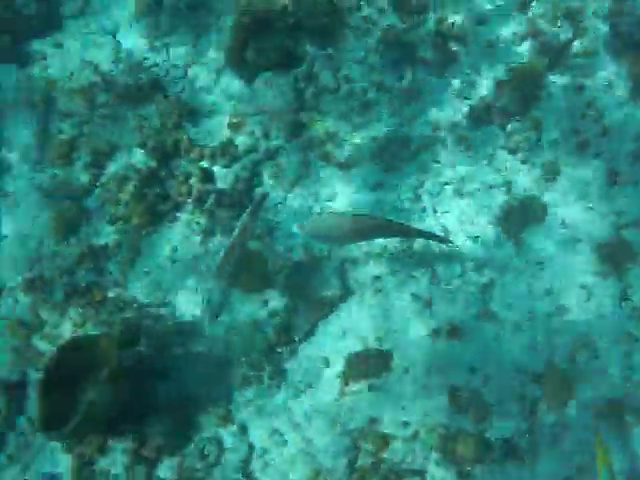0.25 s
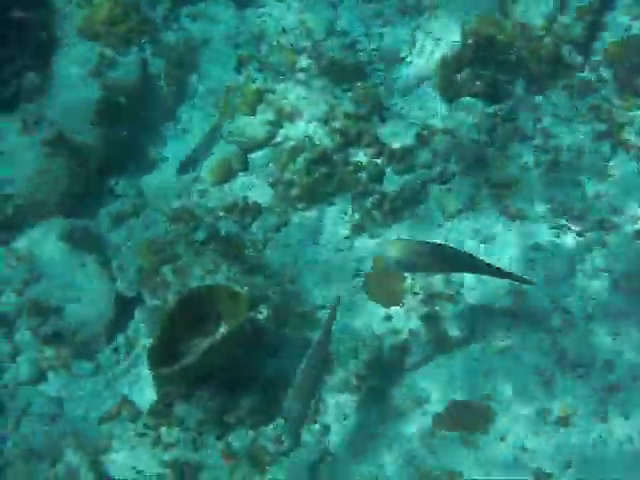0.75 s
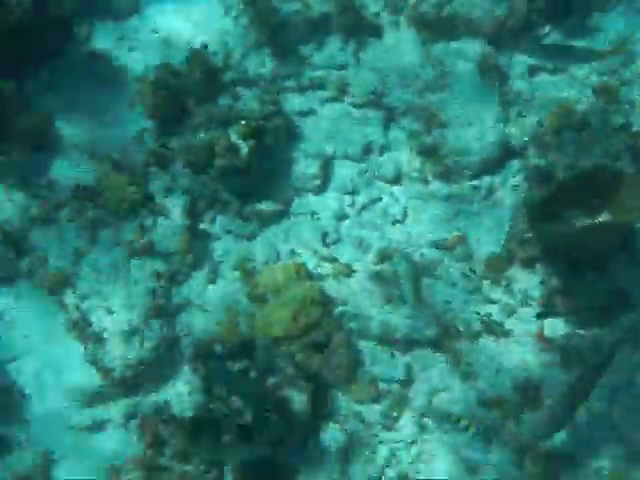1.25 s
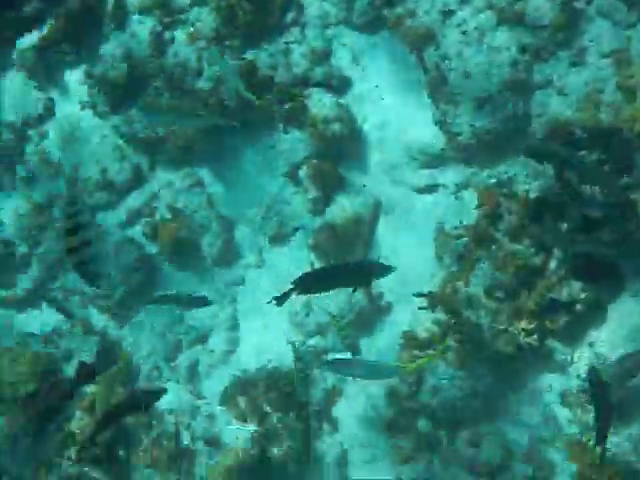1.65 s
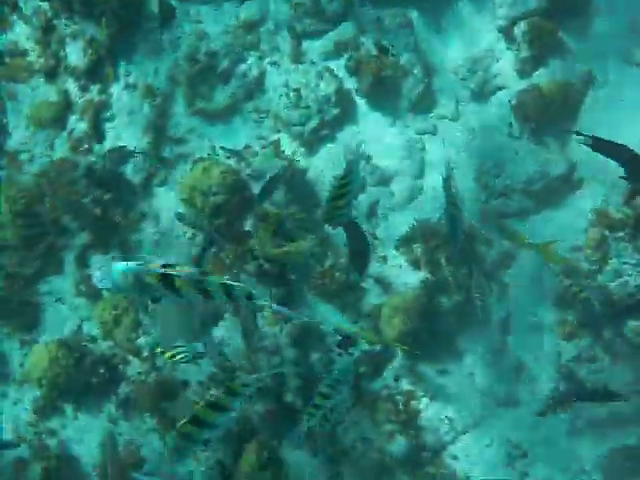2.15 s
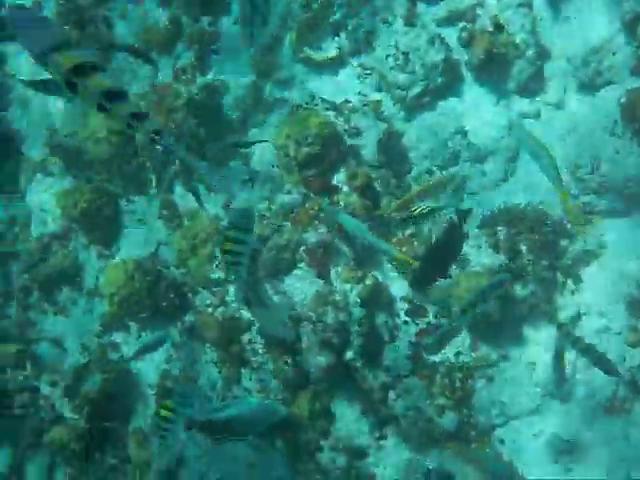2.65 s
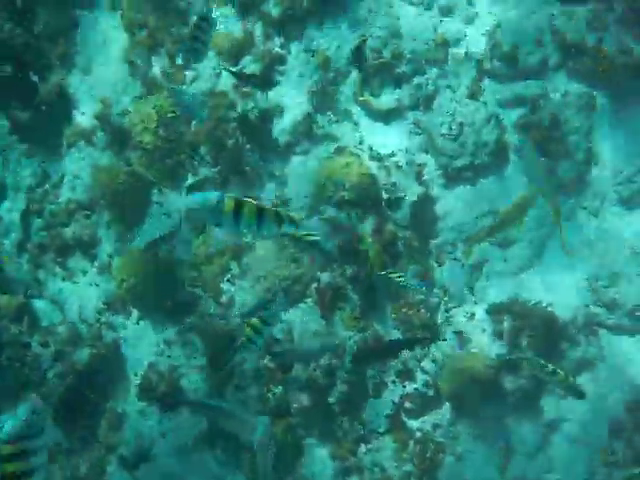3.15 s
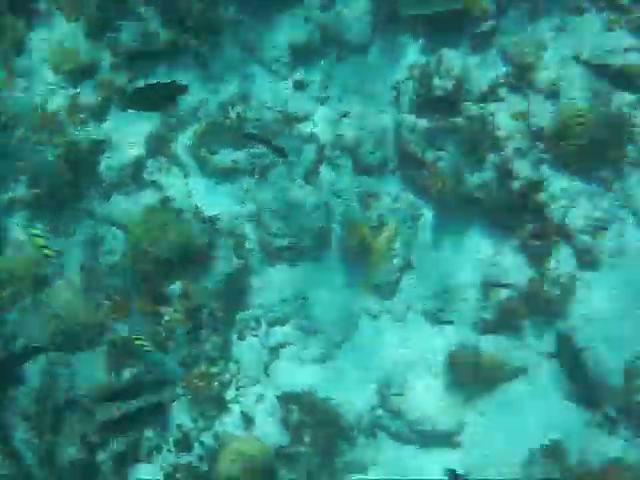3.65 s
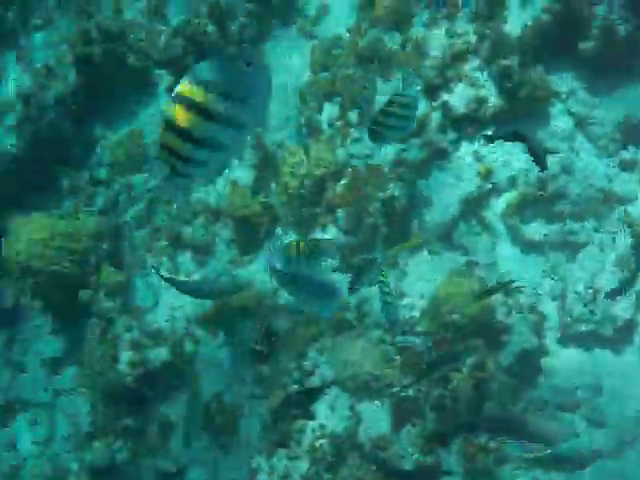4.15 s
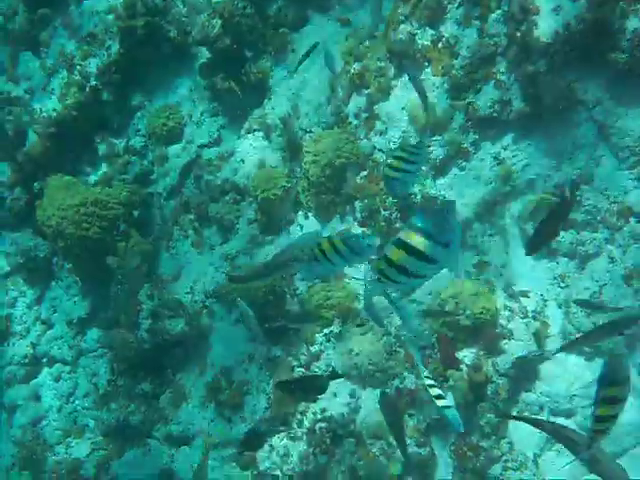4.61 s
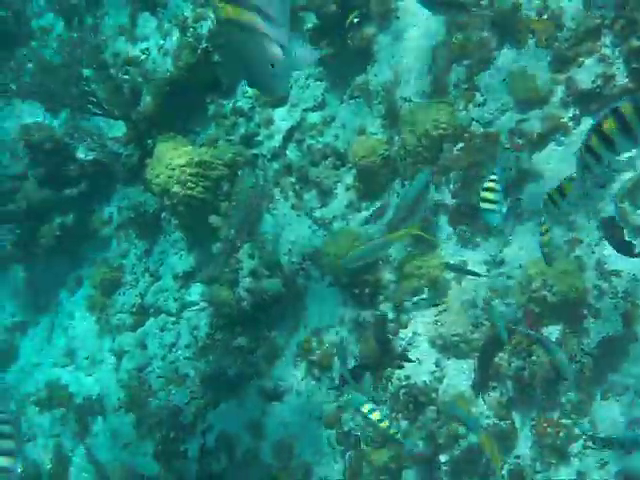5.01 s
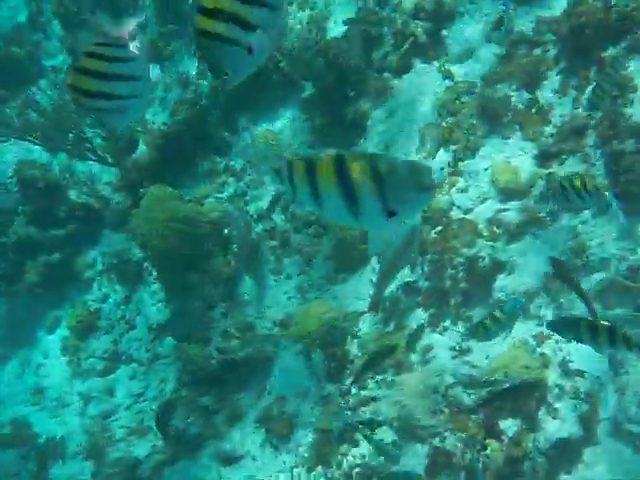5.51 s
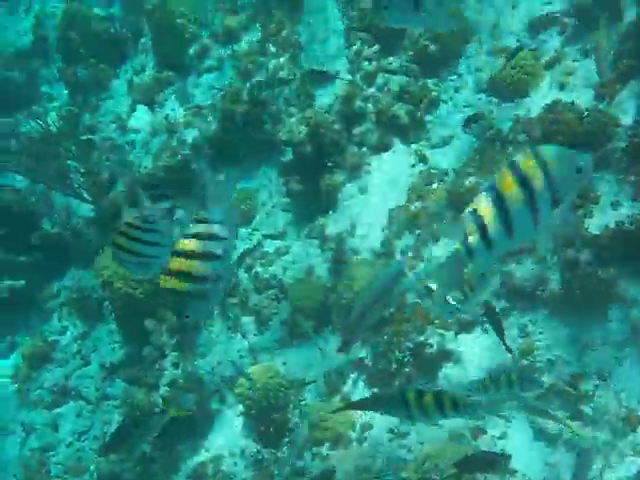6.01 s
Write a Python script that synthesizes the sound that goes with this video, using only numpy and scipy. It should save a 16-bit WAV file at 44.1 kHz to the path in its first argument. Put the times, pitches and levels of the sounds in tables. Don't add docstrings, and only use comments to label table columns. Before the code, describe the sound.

A muffled microphone sealed in a small case hears a boat idling away from a swimmer above a reef. The hollow, buzzing engine pulses fast and evenly, with fine crackle around it. Isolated clicks and knocks come first, then bubbling and sloshing build to a brief distorted burst of thumps, scrapes and snaps. It settles back to the receding motor, light taps and a final small bubble.

```python
import sys
import numpy as np
from scipy import signal
from scipy.fft import rfft, irfft, next_fast_len
from scipy.io import wavfile
from scipy.ndimage import uniform_filter1d, minimum_filter1d, map_coordinates

SR = 44100
rng = np.random.default_rng(int(sys.argv[2]) if len(sys.argv) > 2 else 0)


def invert_db(level):
    return 10 ** (np.asarray(level, dtype=float) / 20)


def file_out(sig):
    cols = np.atleast_2d(sig).T
    lim = np.clip(cols, -1, 1)
    pcm = np.round(lim * 32767).astype(np.int16)
    wavfile.write(sys.argv[1], SR, pcm)


N = 276507
TIME = np.arange(N) / SR

# start_s, peak_db, pitch_hz
NEAR_SNAPS = [(0.33, -21, 3100), (0.4943, -12.5, 3870), (0.5195, -15.5, 3000), (0.544, -31, 4300),
              (0.558, -25, 4200), (0.5, -15, 3000), (0.596, -17, 3300), (0.618, -17, 2880),
              (0.635, -22.5, 3280), (.654, -21, 2970), (.824, -19, 3400), (1.0905, -15, 3240),
              (1.356, -27, 3000), (2.178, 2, 3070), (2.2022, -12, 3300), (2.636, -11.5, 3340),
              (3.0095, -12.5, 3100), (3.4845, -13.5, 3100), (3.6162, -23, 3100), (3.6358, -0.5, 3470),
              (3.6547, 5, 3150), (3.6725, -0.5, 3480), (3.687, -3, 2940), (3.7593, -5, 4220),
              (3.8266, 6.5, 3580), (4.8173, -24, 3500), (5.1282, -27, 4600), (5.197, -20, 4000),
              (5.2202, -12.5, 3750), (5.38, -19, 3150)]
# frequency_hz, density_db (per Hz)
FAR_CRACKLE = [(1500, -39.5), (2500, 27), (4000, 20.5), (5300, 18), (6300, -70)]
SNAP_T60_S, LOUD_RINGS_LONGER = 0.011, 0.18

# peak_s, surge_db, gurgle_db, half_length_s
SLOPS = [(1.24, -32, -41.5, 0.45), (3.137, -24, -12, .04), (3.295, -15.5, -24.5, .09),
         (3.414, -36, -15.5, 0.056), (3.649, -7, -8, 0.074), (3.7, -14.5, 2, 0.08), (3.822, -10, -8, 0.053),
         (3.932, -20, -26.5, 0.12), (4.004, -23, -18, 0.015), (4.075, -24.5, -13, 0.14),
         (4.17, -27.5, -19.5, 0.094), (4.267, -26.5, -30, 0.067), (4.508, -30, -38.5, 0.12),
         (2.886, -32, -30, 0.11)]
# frequency_hz, density_db (per Hz)
SURGE_SPECTRUM = [(8, -4), (22, 0), (45, -6), (80, -10), (120, -40)]
# frequency_hz, density_db (per Hz)
GURGLE_SPECTRUM = [(60, -54), (100, -7), (200, -3), (330, -6), (450, -1), (750, -46), (1500, -40.5)]
# start_s, length_s, signed_size (full scale)
PUSHES = [
    (3.431, .013, .21),
    (3.753, .07, -.42),
    (3.828, 0.052, .33),
    (3.912, 0.067, -0.096),
    (3.968, .04, .1),
]
CALM_SURGE_DB, CALM_GURGLE_DB = (-38.5, -36.5), (-28.5, -33)
SWELL_DB = 1.2
FALL_DB, RELEASE = 23.5, 1.13

# start_s, peak_db, pitch_hz, t60_s
BUBBLES = [(1.248, -10, 53, 0.051), (3.007, -11.5, 361, 0.046), (3.064, -7, 246, 0.03),
           (3.123, 4.5, 319, 0.085), (3.251, -18.5, 92.5, 0.093), (3.273, -12.5, 189, 0.14),
           (3.327, -18, 209.6, 0.084), (3.41, -13, 392, 0.093), (3.455, -3, 72, 0.027),
           (3.512, -19, 267, 0.097), (3.739, -11, 319, 0.068), (3.827, -11.5, 330, 0.083),
           (3.901, -17.5, 54.8, 0.041), (3.981, -17, 105, 0.037), (4.063, -4, 339.4, 0.019),
           (4.087, -10, 137, 0.14), (4.117, -10, 47.7, 0.15), (4.166, -9.5, 275, 0.071),
           (5.857, -14.5, 148.4, 0.069),
           (6.018, -7, 835, .09),
    (3.614, -2, 125, .07),
    (3.585, -13, 150, .05),
    (3.66, -4, 110, .06),
    (3.715, -5, 120, .06),
]

# start_s, length_s, level_db
SCRAPES = [
    (3.622, .04, 7.5),
    (3.668, 0.027, 6),
    (3.823, .011, 9),
]
# frequency_hz, density_db (per Hz)
RUBBING_SPECTRUM = [(90, -8), (200, 14.5), (450, 5.5), (800, 5.5), (1500, 0), (3000, -18), (5500, -31.5),
                    (7000, -48)]
# start_s, peak_db
HARD_KNOCKS = [(0.4929, 6), (2.178, 10.5), (3.7633, 9), (3.8218, 7.5), (5.178, -6), (5.367, -1.5), (2.38, -4),
               (3.332, 0), (3.789, -2), (3.942, -2), (5.347, -7), (6.186, -9.5), (6.223, -10.5)]
# frequency_hz, level_db
KNOCK_MODES = [(800, -1), (1050, -0.5), (1600, -12)]

FIRING_HZ, CYLINDERS = 52.63, 8
# time_s, lag_ms
DRIFT = [(0, 5.9), (.3, 7.3), (.95, 7.95), (1.25, 7.6), (1.8, 6.55), (2.4, 7.0), (2.75, 8.2), (3.3, 9.25),
         (3.9, 9.55), (4.55, 10.9), (5.25, 9.95), (5.7, 10.45), (6, 11.4), (6.3, 11.75)]
# time_s, loudness_db, hidden_share (0-1, behind the swimmer)
LOUDNESS = [(0, 5, 0.9), (.25, 1, 0.52), (.5, 3, 0.4), (1.1, -1.5, 0.04), (1.6, -3, 0.03), (2.1, 0.5, .05),
            (2.6, 0.5, .01), (3.1, -0.1, 0.2), (3.5, -3.5, 0.02), (4.4, -5.5, .05), (5.1, -6, .1),
            (5.8, -4.5, 0.13), (6.27, -11.5, 0)]
# low_hz, high_hz, repeating_share (0-1), roughness (0-1), knock_gain_db
ENGINE_PARTS = [
    (430, 900, .35, .12, 1.5),
    (900, 1650, .25, .08, 4.5),
    (1650, 2700, .12, .08, 14),
    (2700, 6500, .05, .5, 4),
]
# level_db, loudness_following (dB per dB), hidden_loss_db
PART_LEVELS = [
    (-10.5, 0.86, 6.6),
    (-14, 0.22, 10.5),
    (-21.5, 0.43, 20.5),
    (-36, 0.41, 6.5),
]
# delay_firings, hull_db, combustion_db, block_db, clatter_db
STROKES = [
    (0, -3, 9.5, 7, 8),
    (.14, 5, 5, 2, 3),
    (.69, 5, 1, -6, -6),
]
# firing_db, rebound_db, valve_thud_db
UNEVEN = [(-2, 0, 3), (2, 0, 3), (0, -20, 0), (1, -20, 1), (-2, 1, 0), (1, -1, -1), (1, 2, -4),
          (1, -20, -5)]
# multiple (of the firing rate), start_db, end_db
ORDERS = [(7, -31.5, -47), (2.82, -42.5, -37.5), (14, -36, -38)]
# frequency_hz, density_db (per Hz)
PATH = [(250, -45), (480, -18), (560, -11.5), (719, -9), (785, -6), (1040, -8), (1310, 1.5), (1560, -10),
        (2500, -30), (4820, -35), (5870, -49.5), (7630, -92.5), (12900, -120)]
# centre_hz, width_hz, facing_db, turned_away_db
RINGS = [(629, 138, 0.5, 1), (721, 32.8, -1.5, 13.5), (870, 39, -16, -11), (997.3, 114.5, 5.5, 10.5),
         (1052, 30, -1.5, 7), (1354.5, 8.6, 4, 3.5), (1714, 17, -35.5, 12.5), (1826, 18, 9, -16.5),
         (2030, 75, 6, -20), (2300, 160, 9, 0.5), (3070, 260, 3.5, -8)]
# time_s, turned_away_share (0-1)
TURN = [(0, 0.53), (3, 0.01), (4.2, 0.39), (6.27, 0.3)]


def unit(x):
    return x / np.sqrt(np.mean(x ** 2) + 1e-20)


def curves(rows):
    seconds, *columns = np.transpose(rows)
    return [np.interp(TIME, seconds, column) for column in columns]


def wobble(rate_hz):
    knots = rng.standard_normal(int(N * rate_hz / SR) + 4)
    return map_coordinates(knots, [TIME * rate_hz])


def half_sine(start_s, length_s):
    return np.sin(np.pi * np.clip((TIME - start_s) / length_s, 0, 1))


def filtered(x, response):
    size = next_fast_len(N + SR // 4)
    return irfft(rfft(x, size) * response(np.fft.rfftfreq(size, 1 / SR)), size)[:N]


def coloured(x, points):
    corner_hz, db = np.transpose([(1, -120), *points, (SR, -120)])
    return filtered(x, lambda hz: invert_db(np.interp(np.log(hz + 1), np.log(corner_hz + 1), db)))


def band(x, low_hz, high_hz):
    return filtered(x, lambda hz: ((1 + (low_hz / (hz + 1)) ** 12) * (1 + (hz / high_hz) ** 12)) ** -.5)


def snaps():
    out, t = np.zeros(N + SR), np.arange(SR // 20) / SR
    for start_s, db, pitch_hz in NEAR_SNAPS:
        t60_s = SNAP_T60_S * invert_db(LOUD_RINGS_LONGER * (db + 12))
        burst = invert_db(-60 * t / t60_s) * rng.standard_normal(len(t))
        crack = signal.lfilter(*signal.iirpeak(pitch_hz, 1.6, SR), burst)
        out[round(start_s * SR):][:len(t)] += invert_db(db) * crack / np.abs(crack).max()
    when, chance = rng.random((250, 2)).T
    far_db = -45.5 + np.minimum(-3.5 * np.log(1 - chance), 10)
    far = np.bincount((when * N).astype(int), invert_db(far_db), N)
    decay = invert_db(-60 / (.007 * SR))
    far = signal.lfilter([1], [1, -decay], far) * rng.standard_normal(N)
    return out[:N] + coloured(far, FAR_CRACKLE)


def slosh():
    peak_s, surge_db, gurgle_db, half_s = np.transpose(SLOPS)[:, :, None]
    off_peak = (TIME - peak_s) / half_s
    shape_db = -FALL_DB * np.maximum(-off_peak, off_peak / RELEASE)
    surge = invert_db(np.linspace(*CALM_SURGE_DB, N)) + invert_db(surge_db + shape_db).sum(axis=0)
    gurgle = invert_db(np.linspace(*CALM_GURGLE_DB, N)) + invert_db(gurgle_db + shape_db).sum(axis=0)
    lumps_db = np.clip(8 + 4 * np.log10(gurgle), 1.5, 5)
    heave = unit(invert_db(SWELL_DB * wobble(1.6)) * coloured(rng.standard_normal(N), SURGE_SPECTRUM))
    lumps = unit(invert_db(lumps_db * wobble(40)) * coloured(rng.standard_normal(N), GURGLE_SPECTRUM))
    pushes = sum(size * half_sine(start_s, length_s) for start_s, length_s, size in PUSHES)
    return surge * heave + gurgle * lumps + pushes


def bubbles():
    out, t = np.zeros(N + SR), np.arange(SR // 4) / SR
    for start_s, db, pitch_hz, t60_s in BUBBLES:
        swell = (1 - np.exp(-t / 0.0011)) * invert_db(db - 60 * (t / t60_s) ** 1.8)
        cycles = pitch_hz * t * (1 + 0.14 * t / t60_s)
        out[round(start_s * SR):][:len(t)] += swell * np.sin(2 * np.pi * cycles)
    return out[:N]


def scrapes():
    stroke = sum(invert_db(db) * half_sine(start_s, length_s) ** .5 for start_s, length_s, db in SCRAPES)
    return stroke * unit(invert_db(1.2 * wobble(280)) * coloured(rng.standard_normal(N), RUBBING_SPECTRUM))


def hard_knocks():
    out, t = np.zeros(N + SR), np.arange(SR // 20) / SR
    shell = sum(invert_db(db) * np.sin(2 * np.pi * mode_hz * t) for mode_hz, db in KNOCK_MODES)
    for start_s, db in HARD_KNOCKS:
        out[round(start_s * SR):][:len(t)] += invert_db(db - 60 * (t / 0.0063) ** 2) * shell
    return out[:N]


def crank():
    lag_ms = curves(DRIFT)[0]
    return FIRING_HZ * (TIME - lag_ms / 1000)


def cyclic_noise(firings):
    size = round(CYLINDERS * SR / FIRING_HZ)
    where = firings / CYLINDERS % 1 * size
    first, second = (map_coordinates(rng.standard_normal(size), [where], mode="grid-wrap") for _ in range(2))
    turn = 0.43 * TIME + 0.042 * wobble(1.8)
    return unit(np.cos(turn) * first + np.sin(turn) * second)


def knock_times(firings, place):
    cycle = np.arange(-1, firings[-1] // CYLINDERS + 1)[:, None]
    jitter = 1.6e-4 * SR * rng.standard_normal((len(cycle), len(place)))
    at = np.interp(cycle * CYLINDERS + place, firings, np.arange(N)) + jitter
    return np.clip(at, 0, N - 1).astype(int)


def rung(x):
    centre, width, *ring_db = np.transpose(RINGS)[:, :, None]

    def ringing(db):
        def response(hz):
            damping = 1j * hz * width
            return 1 + np.sum(invert_db(db) * damping / (centre * centre - hz * hz + damping), axis=0)
        return filtered(x, response)

    facing, away = (ringing(db) for db in ring_db)
    turned = np.clip(curves(TURN)[0], 0, 1)
    return (1 - turned) * facing + turned * away


def engine():
    firings = crank()
    delay, *stroke_db = np.transpose(STROKES)
    place = (np.arange(CYLINDERS)[:, None] + delay).ravel()
    at = knock_times(firings, place)
    scatter_db = 2.1 * rng.standard_normal(at.shape)
    loud_db, hidden = curves(LOUDNESS)
    inside = np.arange(N) % (N - 1) > 0
    total = 0
    for part, levels, part_db in zip(ENGINE_PARTS, PART_LEVELS, stroke_db):
        low_hz, high_hz, repeat, rough, gain_db = part
        base_db, follows, loss_db = levels
        level_db = base_db + follows * loud_db - loss_db * hidden
        repeat, rough = np.clip([repeat, rough], 0, 1)
        knock_db = (part_db + np.array(UNEVEN)).ravel() + scatter_db + gain_db
        blows = np.bincount(at.ravel(), invert_db(knock_db).ravel(), N) * inside
        sharp = blows * np.sqrt(SR / (high_hz - low_hz))
        decay = invert_db(-60 / (.02 * SR))
        rattle = signal.lfilter([1], [1, -decay], blows) * rng.standard_normal(N)
        drone = np.sqrt(repeat) * cyclic_noise(firings) + np.sqrt(1 - repeat) * rng.standard_normal(N)
        source = np.sqrt(1 - rough) * sharp + np.sqrt(rough) * rattle + drone * invert_db(0.13 * wobble(12))
        total = total + invert_db(level_db - 6.0) * unit(band(coloured(source, PATH), low_hz, high_hz))
    total = rung(total)
    for multiple, start_db, end_db in ORDERS:
        order_db = np.linspace(start_db, end_db, N) + 0.72 * wobble(6.3)
        phase = 2 * np.pi * multiple * firings + .8 * wobble(12)
        total = total + invert_db(order_db) * np.sin(phase)
    return total


def scene():
    return (snaps() + slosh() + bubbles() + scrapes() + hard_knocks() + engine())[None]


def band_limit(x):
    return signal.sosfilt(signal.butter(12, 15900, fs=SR, output="sos"), x)


def record(dry):
    voiced = band(dry[0], low_hz=280, high_hz=6500)
    envelope = np.abs(signal.hilbert(voiced, next_fast_len(N))[:N])
    needed = np.clip(.715 / (envelope + 1e-9), invert_db(-6), 1)
    gain = uniform_filter1d(minimum_filter1d(needed, size=45), size=45)
    dull = filtered(gain * dry[0], lambda hz: (1 + (hz / 5600) ** 24) ** -.5)
    clipped = np.clip(dull - .004, -.705, .715)
    clipped = filtered(clipped, lambda hz: 1 - .5 * np.exp(-((hz - 7000) / 1200) ** 2))
    clipped = clipped * np.clip((N / SR - TIME) / .004, 0, 1)
    hiss = invert_db(-104.5) * rng.standard_normal((1, N))
    return band_limit(clipped[None] + hiss)


dry = scene()
out = record(dry)
file_out(out)
```